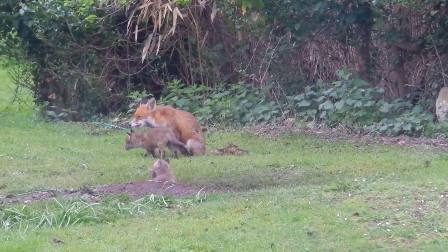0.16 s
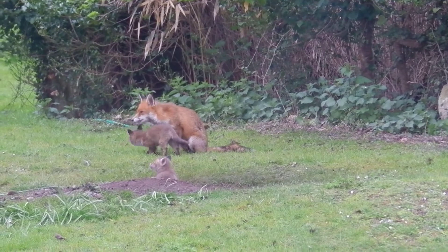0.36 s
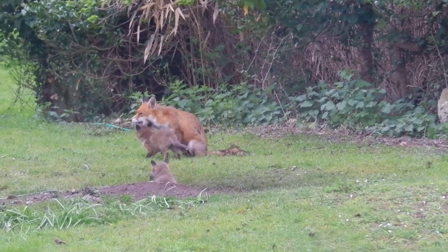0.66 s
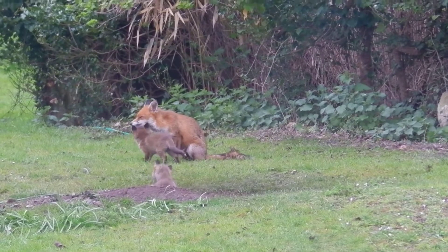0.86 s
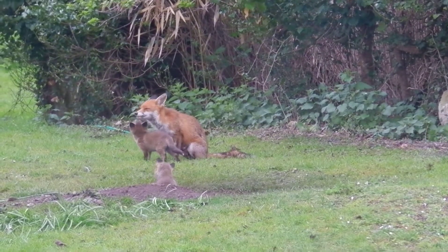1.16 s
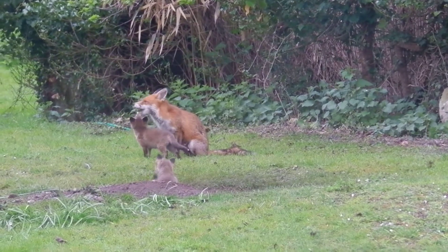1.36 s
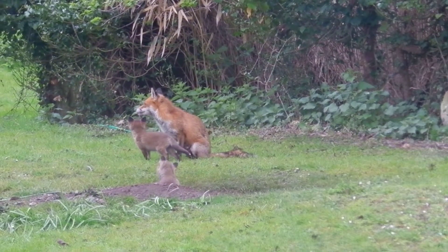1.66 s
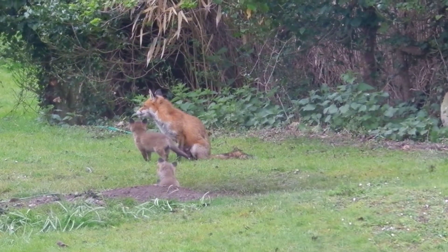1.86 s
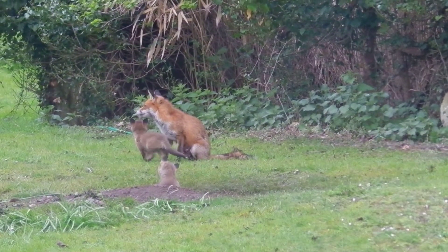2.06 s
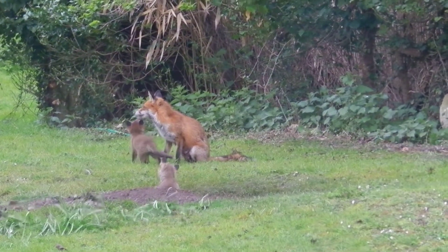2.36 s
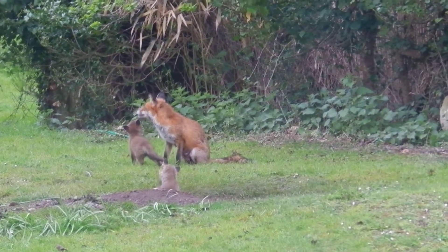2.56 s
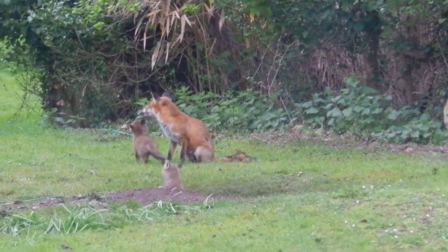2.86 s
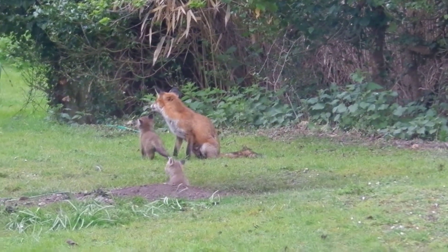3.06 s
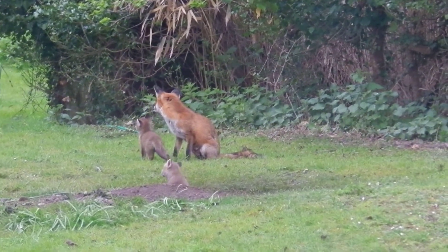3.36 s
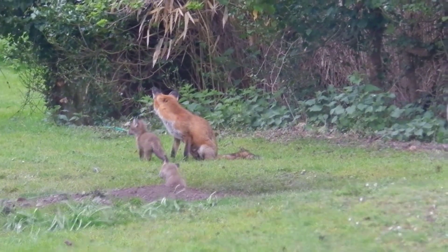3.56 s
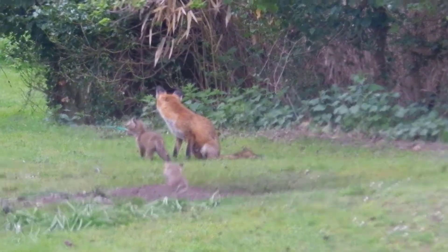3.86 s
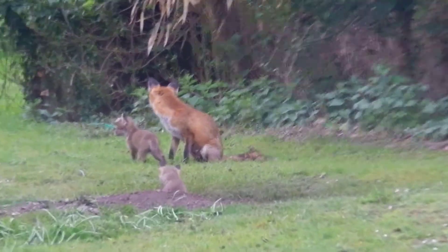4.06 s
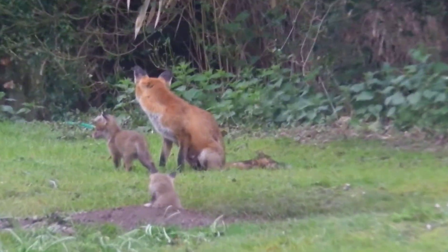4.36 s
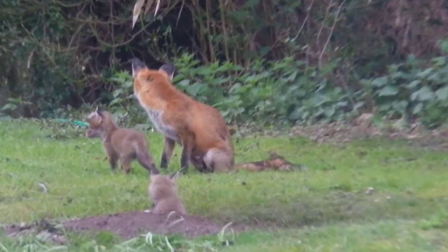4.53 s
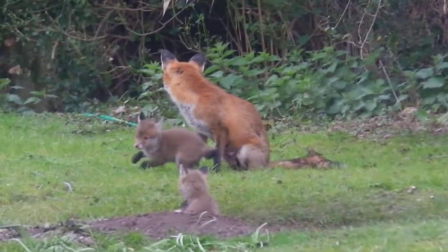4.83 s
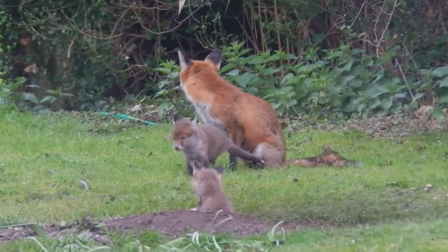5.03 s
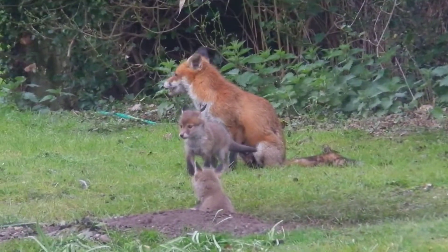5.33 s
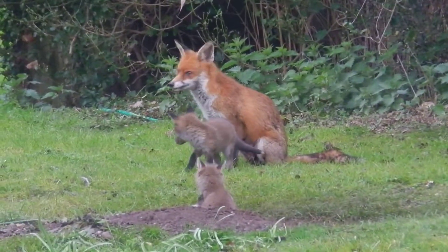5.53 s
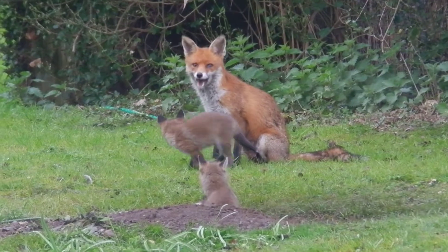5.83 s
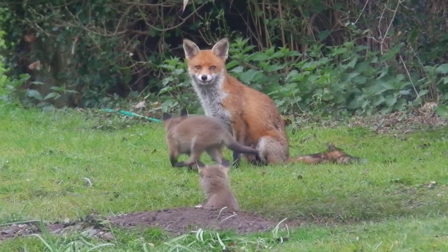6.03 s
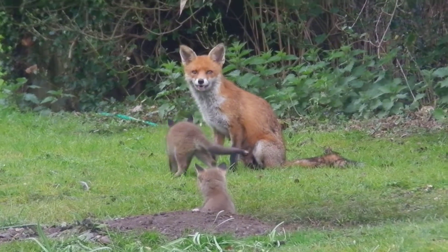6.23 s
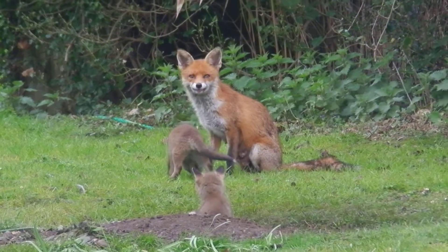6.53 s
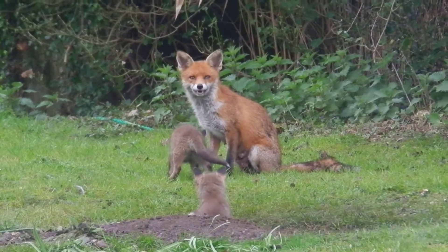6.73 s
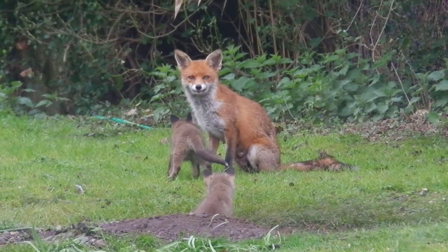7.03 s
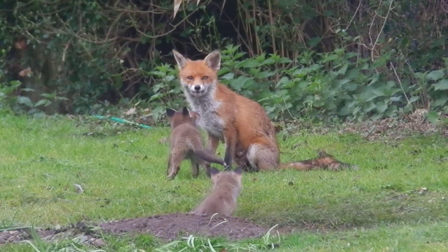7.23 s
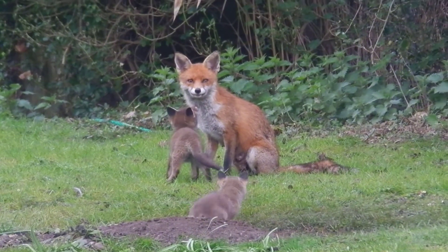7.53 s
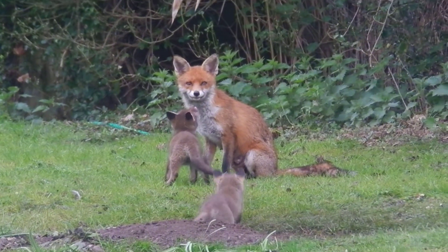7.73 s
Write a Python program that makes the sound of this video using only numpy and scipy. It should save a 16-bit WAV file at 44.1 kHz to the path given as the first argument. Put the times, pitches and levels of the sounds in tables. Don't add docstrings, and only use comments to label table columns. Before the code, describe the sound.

In a quiet garden, close camera handling clicks and knocks accompany two trains of tiny motor buzzes separated by a brief grinding zoom whir.

```python
import sys
import numpy as np
from scipy import signal
from scipy.fft import rfft, irfft
from scipy.io import wavfile
from scipy.ndimage import uniform_filter1d

SR = 44100
rng = np.random.default_rng(int(sys.argv[2]) if len(sys.argv) > 2 else 0)


def convert_level_to_amplitude(level_db):
    exponent = np.asarray(level_db, float) / 20
    return 10 ** exponent


def transcribe(signal):
    frames = np.atleast_2d(signal).T
    limited = np.clip(frames, -1, 1)
    pcm = np.round(limited * 32767).astype(np.int16)
    wavfile.write(sys.argv[1], SR, pcm)


N = 347831


def level(x, db=0):
    return x * convert_level_to_amplitude(db) / np.sqrt(np.mean(x ** 2))


def over_hz(table):
    hz, *columns = np.transpose(table)
    bins_hz = np.arange(1, N // 2 + 2) * SR / N
    return [np.interp(np.log(bins_hz), np.log(hz), column) for column in columns]


def coloured(x, spectrum):
    return irfft(rfft(x) * convert_level_to_amplitude(over_hz(spectrum)[0]), N)


def ring(x, modes):
    out = 0
    for k, (hz, width, db) in enumerate(modes):
        mode = signal.lfilter(*signal.iirpeak(hz, hz / width, SR), x)
        out = out + (-1) ** k * convert_level_to_amplitude(db) * mode
    return out


def walk(rate):
    size = int(SR / rate)
    held = np.repeat(rng.standard_normal(N // size + 1), size)[:N]
    return level(uniform_filter1d(uniform_filter1d(held, size), size))


def ramp(t, s, length):
    return np.clip((t - s) / length, 0, 1)


def add(out, s, x):
    start = int(s * SR)
    out[..., start:start + x.shape[-1]] += x


def focus_moves(moves, barrel, rough, gain_db):
    step_hz, step_spread = 254.4, 0.006
    lead_s, attack_s, release_s, sag_db = 0.003, 0.006, 0.0085, -1.1
    settle_s, settle_db = 0.016, -5.5
    drive = np.zeros((2, N))
    for s, db, length in moves:
        t = np.arange(int((length + settle_s) * SR)) / SR
        grit = rng.standard_normal((2, SR // 10))[:, :len(t)]
        turn = t * step_hz * (1 + step_spread * rng.standard_normal())
        steps = np.exp(-(turn % 1) / 0.067)
        steps = signal.lfilter([3, -3], [1, -0.88], steps)
        release = ramp(t, length - release_s, release_s)
        swell = ramp(t, 0, attack_s) * convert_level_to_amplitude(sag_db * t / length + settle_db * release)
        swell = swell * ramp(-t, -length - settle_s, settle_s)
        buzz = steps - steps.mean() + rough * grit * (0.71 + steps)
        add(drive, s - lead_s, convert_level_to_amplitude(db) * swell * buzz)
    return convert_level_to_amplitude(gain_db) * ring(drive, barrel)


def focus():
    # (time [s], peak level [dB], length [s])
    moves_wide = [(1.477, -39.5, .032), (1.576, -41, 0.033), (1.674, -40, 0.042), (1.779, -42.5, 0.036),
                  (1.876, -44, .031), (1.974, -42, .043), (2.074, -39.5, 0.023), (2.177, -36, 0.03),
                  (2.679, -38, 0.034), (2.78, -42, .035), (2.877, -41, 0.047), (2.979, -43.5, 0.039),
                  (3.078, -43, 0.036), (3.176, -41.5, .027), (3.28, -38.5, 0.034), (3.377, -38, 0.02)]
    moves_tele = [
        (3.782, -33.5, 0.031),
        (4.514, -36, 0.026),
        (4.693, -36.5, .025),
        (5.212, -38.5, 0.029),
        (5.313, -38.5, .036),
        (5.413, -34.5, 0.024),
        (5.511, -39, 0.046),
        (5.614, -37, .025),
        (5.714, -37.5, 0.037),
        (5.95, -44, .012),
    ]
    # (frequency [Hz], width [Hz], level [dB])
    barrel_wide = [(205, 27.5, 5.5), (504, 212, -3), (724, 177, -3.5), (1032, 106, -0.5), (1133, 100, -4),
                   (1250, 260, -16.5), (1600, 154, -14.5), (2310, 500, -27.5)]
    barrel_tele = [(216, 28, 6.5), (500, 270, -2), (764, 140, 1.5), (944, 37, 1.5), (1088, 71, 0.5),
                   (1440, 270, -14.5), (1850, 380, -18), (2500, 690, -28)]
    wide = focus_moves(moves_wide, barrel_wide, rough=2.92, gain_db=8.0)
    tele = focus_moves(moves_tele, barrel_tele, rough=2.7, gain_db=4.5)
    return wide + tele


def zoom():
    # (frequency [Hz], width [Hz], level [dB])
    zoom_modes = [(255, 134, -6.5), (602, 73, -1.5), (747, 106, -4.5), (1104, 54, 1.5), (1940, 200, -4),
                  (2340, 210, 0), (2570, 150, -11.5), (3380, 270, -5), (4600, 400, -47), (6070, 140, -7),
                  (6340, 140, -6)]
    gear_modes, brush_modes, whine_modes = zoom_modes[:4], zoom_modes[4:9], zoom_modes[9:]
    # (frequency [Hz], density [dB per Hz])
    hiss = [(59, -41), (100, -37), (249, 2.5), (415, -24), (1100, -10), (1360, -11.5), (2000, -11),
            (2930, -13), (6150, -18.5), (16000, -27)]
    # (frequency [Hz], width [Hz], depth [0-1])
    dips = [(2950, 230, .3), (5500, 400, 0.2)]
    shaft_hz, segments = 40.6, 6
    start_s, engage_s, stop_s = 3.82, 3.895, 4.645
    spin_up_s, take_load_s, brush_stop_s, gear_coast_s, gear_stop_s = 0.015, 0.025, 0.05, 0.059, 0.05
    brush_db, gear_db, idle_db, brush_creep_db, gear_creep_db = -46, -44, -5.5, 0.5, 1
    whine_grow_db = 8.5

    t = np.arange(N) / SR
    travel = ramp(t, engage_s, stop_s - engage_s)
    run = ramp(t, start_s, spin_up_s) ** 2 * convert_level_to_amplitude(idle_db * (1 - ramp(t, engage_s, take_load_s)))
    brush_stop = (1 - ramp(t, stop_s, brush_stop_s)) ** 2
    gear_stop = (1 - ramp(t, stop_s + gear_coast_s, gear_stop_s)) ** 2
    brush = run * convert_level_to_amplitude(brush_db + brush_creep_db * travel) * brush_stop
    gear = run * convert_level_to_amplitude(gear_db + gear_creep_db * travel) * gear_stop

    turn = t * shaft_hz + 0.015 * walk(6)
    shaft = 1 + 0.077 * np.cos(2 * np.pi * turn)
    commutator = 2.3 + np.exp(-(turn * segments % 1) / 0.17)
    gate = shaft * commutator * convert_level_to_amplitude(0.86 * walk(40))
    drive = gate * rng.standard_normal((2, N))

    whine = convert_level_to_amplitude(whine_grow_db * (travel - 2)) * ring(drive, whine_modes)
    high = level(ring(drive, brush_modes) + whine, -0.0074) + level(coloured(drive, hiss), -1.5)
    for hz, width, depth in dips:
        high = high - depth * ring(high, [(hz, width, 0)])
    grind = level(ring(drive * convert_level_to_amplitude(1.16 * walk(14)), gear_modes))
    return brush * high + gear * grind


def chatter():
    # (time [s], length [s], from [Hz], to [Hz], level [dB])
    glides = [
        (3.935, 0.051, 156, 205, -47),
        (3.985, 0.13, 205, 224, -48),
        (4.16, 0.22, 205, 243.3, -50.5),
        (4.35, 0.092, 349, 387, -46.5),
        (4.44, 0.07, 370, 356, -43),
        (4.552, .14, 316, 327, -39.5),
        (3.93, 0.135, 1090, 1170, -58),
        (4.26, 0.046, 1056, 1133, -47),
        (4.4, 0.33, 1118, 1097, -59),
        (4.53, 0.17, 746, 820, -55),
    ]
    out = np.zeros((2, N))
    for s, length, from_hz, to_hz, db in glides:
        t = np.arange(int(length * SR)) / SR
        start = int(s * SR)
        wobble, waver = (walk(rate)[start:start + len(t)] for rate in (30.5, 22.7))
        pitch_hz = (from_hz + (to_hz - from_hz) * t / length) * (1 + 0.0038 * wobble)
        phase = 2 * np.pi * np.cumsum(pitch_hz) / SR
        size = convert_level_to_amplitude(db + 2.0 + 1.9 * waver) * signal.windows.tukey(len(t), 0.3)
        add(out, s, size * np.array([np.sin(phase), np.cos(phase)]))
    return out


def ticks():
    # (frequency [Hz], level [dB])
    back_modes = [(210, 6.5), (330, 6.5), (430, 5.5)]
    low_modes = [(570, -9), (720, 1.5), (830, 1.5), (1050, -10)]
    lid_modes = [(1450, 0)]
    high_modes = [(1900, 18.5), (2200, -47), (2590, 9.5), (3100, -27), (3900, -11), (4700, -72), (5580, -1),
                  (7200, -0.5), (9500, -23)]
    # (time [s], peak level [dB], hard high-mode level [dB], t60 [s])
    back_ticks = [(0.28, -44, -18, 0.031), (2.165, -32.5, -3, 0.027), (2.187, -33, -4.5, 0.042),
                  (2.196, -61, -22, .022), (2.593, -53, 3.5, 0.0094), (2.819, -47, 0, 0.015),
                  (2.965, -48, 0, .037), (3.277, -33, -32, .061), (3.376, -49, 6, .021),
                  (3.745, -39.5, -20, 0.031), (4.258, -38, 0, 0.037)]
    side_ticks = [
        (2.16, -30.5, -6, 0.0089),
        (3.478, -43, -4, 0.024),
        (3.503, -38, -12, .02),
        (3.531, -45, -20, 0.035),
        (3.65, -39, -9, .035),
        (3.722, -29, -7, 0.029),
        (3.853, -39, 0.5, 0.038),
        (3.992, -40.5, 3, 0.03),
        (4.33, -40, -12, .03),
        (6.779, -47.5, -0.5, 0.022),
    ]
    lid_ticks = [
        (0.667, -44, 3, 0.014),
        (3.488, -28, -4.5, 0.02),
        (3.609, -33, -9, 0.015),
        (4.18, -24, 7.5, 0.029),
    ]
    # (back part [dB], lid part [dB])
    reach = [(-4.5, -8.5), (-7.5, -12), (-9, -3.5)]
    # (modes, damping factor, push time [s])
    parts = (back_modes, 1.1, 3e-4), (low_modes, 1.5, 1.5e-4), (lid_modes, 1.3, 1e-4), (high_modes, 3.5, 3e-5)

    out, t = np.zeros((2, N)), np.arange(SR // 10) / SR
    for place, (back_db, lid_db) in zip((back_ticks, side_ticks, lid_ticks), reach):
        for s, db, hard_db, t60 in place:
            contact = 0.085 * rng.standard_normal((2, len(t))) * np.exp(-t / 0.0077)
            contact[[0, 1], [0, 25]] = 1
            detune = 1 + 0.02 * rng.standard_normal(9)
            for (modes, damp, push_s), part_db in zip(parts, (back_db, 0, lid_db, hard_db)):
                push = signal.lfilter(t[:80] * np.exp(-t[:80] / push_s), 1, contact)
                tuned = [(hz * d, damp * 3.9 / t60 + 0.026 * hz, g) for (hz, g), d in zip(modes, detune)]
                rung = ring(push, tuned)
                add(out, s, convert_level_to_amplitude(db + part_db + 4.0) * rung / abs(rung).max())
    return out


def thumps():
    # (time [s], peak level [dB], frequency [Hz], t60 [s])
    rocks = [(2.172, -28.5, 93, 0.14), (2.188, -13, 320, 0.0098), (2.215, -31, 73.5, 0.21),
             (2.406, -31, 95, 0.059), (2.439, -34, 79, 0.13), (2.598, -28, 71, 0.2),
             (3.2776, -7.5, 282, 0.022), (3.2812, -16.5, 295, 0.015), (3.285, -22.5, 110, 0.14),
             (3.291, -23, 165, 0.086), (3.301, -26, 82.4, 0.29), (3.931, -37, 72, 0.21),
             (6.962, -35.5, 100, 0.11), (7.219, -48, 71, 1)]
    out, t = np.zeros(N), np.arange(SR // 3) / SR
    for s, db, hz, t60 in rocks:
        onset = np.minimum(t * hz * 2, 1)
        add(out, s, -convert_level_to_amplitude(db) * onset * np.sin(2 * np.pi * hz * t) * 1000 ** (-t / t60))
    return signal.sosfilt(signal.butter(2, 45, "high", fs=SR, output="sos"), out)


def slips():
    # (time [s], length [s], level [dB], frequency [Hz], width [Hz])
    rubs = [(0.245, 0.017, -64, 2500, 300), (0.503, 0.018, -65, 4400, 2000),
            (.625, 0.088, -56.5, 6500, 11000), (.645, .04, -66, 5700, 700), (0.665, 0.008, -49, 3500, 2800),
            (0.688, 0.0083, -43, 6300, 3100), (0.876, 0.049, -59, 4400, 2000),
            (3.257, 0.018, -46, 690, 1500), (3.28, 0.12, -42.5, 200, 440), (3.46, 0.11, -51, 1290, 2200),
            (3.602, 0.066, -51.5, 950, 2100), (3.693, 0.064, -55.5, 1200, 2300),
            (4.161, 0.042, -44.5, 5000, 6000), (4.177, .007, -36.5, 5000, 7600),
            (2.156, 0.02, -61, 7000, 9000), (2.164, 0.0041, -48, 4520, 2000),
            (2.819, 0.0042, -52, 5000, 8000), (6.398, 0.071, -55, 4070, 500), (6.4, .09, -54.5, 6370, 7900),
            (6.411, 0.068, -58.5, 1400, 1300), (6.775, .12, -63.5, 5500, 6000),
            (6.778, .008, -58, 6000, 7000), (6.809, 0.048, -66, 4050, 400), (3.364, 0.028, -62, 3500, 5000)]
    out = np.zeros((2, N))
    for s, length, db, hz, width in rubs:
        grain = rng.standard_normal((2, SR // 8))[:, :int(length * SR)]
        grain[1] -= 0.13 * grain[0]
        band = [(hz, width, 0)]
        rub = level(ring(ring(grain, band), band), db)
        fade = signal.windows.tukey(rub.shape[1], 0.75)
        add(out, s, rub * fade * convert_level_to_amplitude(np.array([[1.2], [-1.2]])))
    return out


def through_shell(paths):
    # (frequency [Hz], left minus right [dB], left lead [rad], likeness [0-1])
    ports = [(60, -9, 16, 1), (241, -12, -2.65, 0.96), (417, 2, 0, 0.6), (860, -0.5, 0.5, 1),
             (2600, 5.5, 0.88, 0.96), (4800, 7, 5.5, 1), (8260, -1, -6, 0.7), (14600, -6, 4.5, 0)]
    pan_db, lead, like = over_hz(ports)
    first, second = rfft(paths)
    like = np.clip(like, 0, 1)
    tilt = convert_level_to_amplitude(pan_db / 2) * np.exp(0.5j * lead)
    left = first * tilt
    right = (like * first + np.sqrt(1 - like ** 2) * second) / tilt
    return irfft(np.array([left, right]), N)


def air():
    # (frequency [Hz], density [dB per Hz])
    mid_spectrum = [(12, -54), (20, -42), (53, -10.5), (70, 0.5), (146, -5.5), (177, -7.5), (241, -15),
                    (399, -14.5), (434, -17), (472, -19), (574, -19), (1090, -22.5), (2530, -36.5),
                    (13200, -40.5), (16000, -43)]
    side_spectrum = [(12, -54), (20, -15), (37, -40), (58, -9), (91, -3), (222, -9), (255, -10),
                     (310, -10.5), (590, -15), (1480, -21), (2820, -28), (11100, -31.5), (16000, -36)]
    # (time [s], strength [0-1], length [s])
    gusts = [
        (.4, 0.2, .3),
        (2.3, 1, .4),
        (3.42, .9, 0.6),
        (5.4, 0.5, 0.26),
        (6.8, 0.8, 0.25),
        (7.55, 1, 0.31),
    ]
    calm_buffet_db, gust_buffet_db, calm_rumble_db, gust_rumble_db = -78, 14, -0.5, 2
    hum_hz, hum_db = 435.3, -59.5

    mid = level(coloured(rng.standard_normal(N), mid_spectrum), -50.5)
    side = level(coloured(rng.standard_normal(N), side_spectrum), -54)
    rumble = signal.sosfilt(signal.butter(2, 200, fs=SR, output="sos"), mid)
    t = np.arange(N) / SR
    breeze = sum(size * np.exp(-((t - s) / length) ** 2) for s, size, length in gusts)
    wind = convert_level_to_amplitude(calm_buffet_db + gust_buffet_db * breeze)
    swell = convert_level_to_amplitude(calm_rumble_db + gust_rumble_db * breeze) * convert_level_to_amplitude(0.58 * walk(3.22))
    flutter = [(28, 14, 0)]
    buffet = level(ring(ring(rng.standard_normal(N), flutter), flutter), -2)
    mid = mid + (swell - 1) * rumble + wind * buffet

    phase = 2 * np.pi * np.cumsum(hum_hz + 1.39 * walk(6.2)) / SR
    hum = convert_level_to_amplitude(hum_db + 1.5 * walk(12)) * np.sin(phase + np.array([[0.15], [-0.15]]))
    return mid + side * np.array([[1], [-1]]) + hum


def scene():
    inside = focus() + zoom() + chatter() + ticks()
    return through_shell(inside) + thumps() + slips() + air()


def low_pass(x):
    return signal.sosfilt(signal.butter(12, 16280, fs=SR, output="sos"), x)


def record(dry):
    top_hz = 15720
    lowpass = signal.ellip(10, 0.1, 70, top_hz, fs=SR, output="sos")
    mix = signal.sosfilt(lowpass, dry)
    return low_pass(mix)


dry = scene()
out = record(dry)
transcribe(out)
```